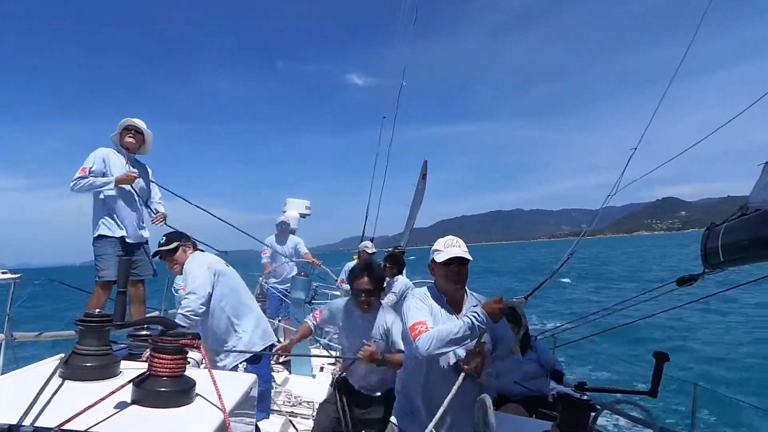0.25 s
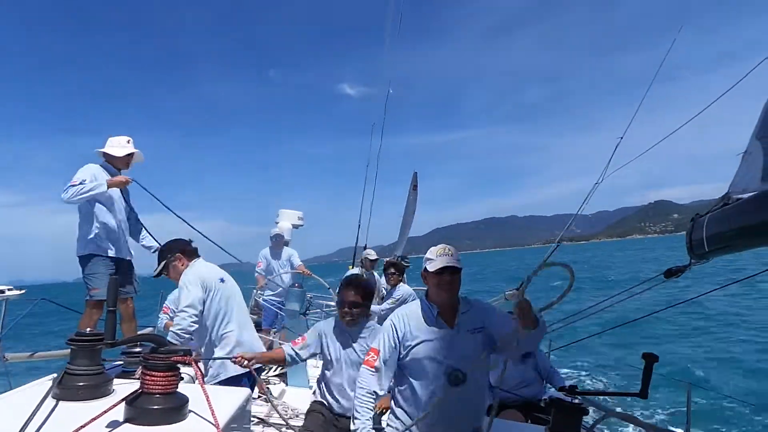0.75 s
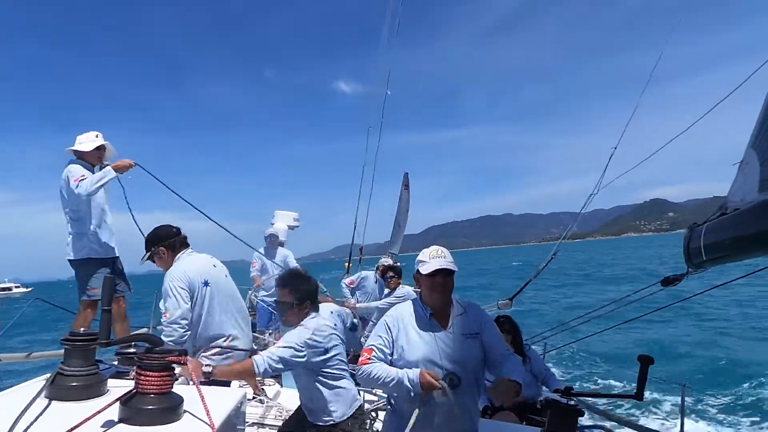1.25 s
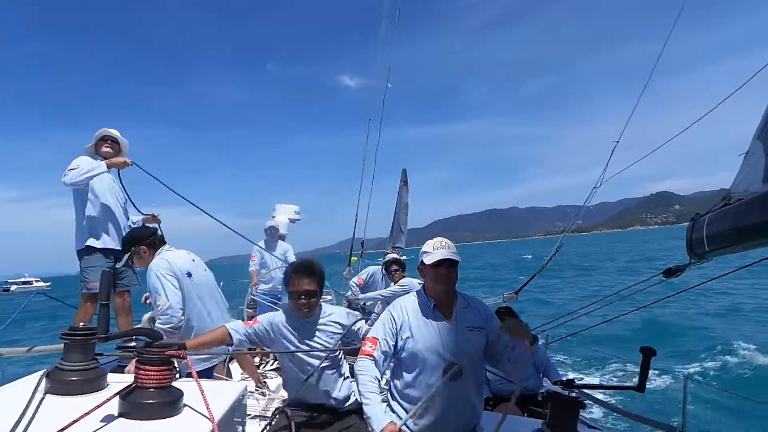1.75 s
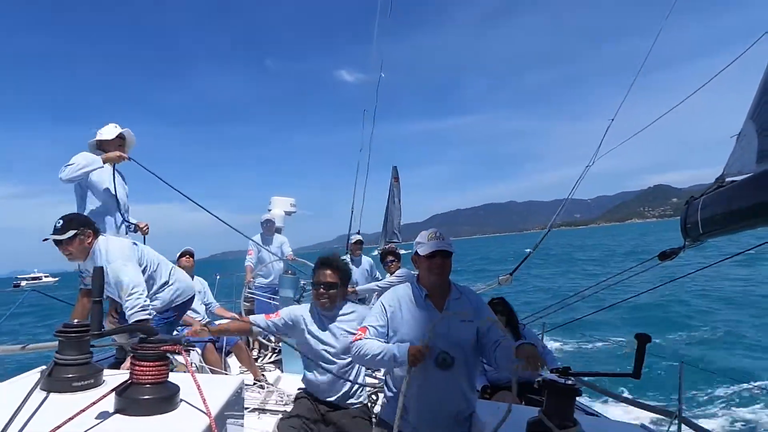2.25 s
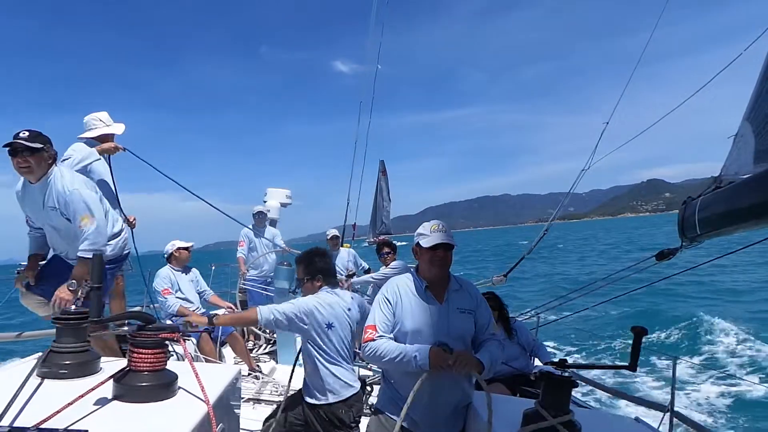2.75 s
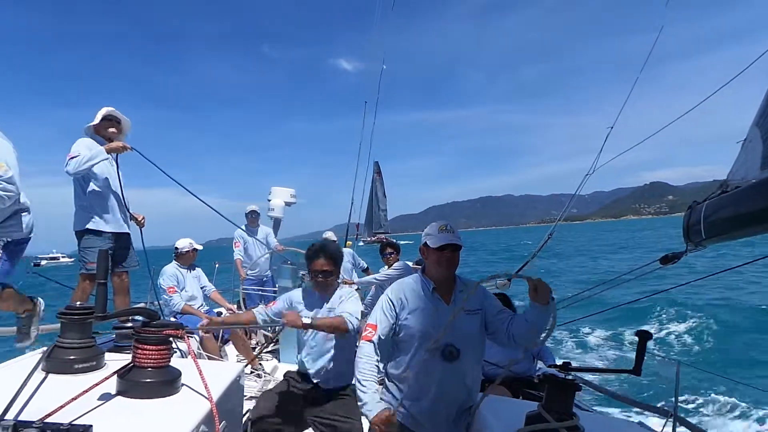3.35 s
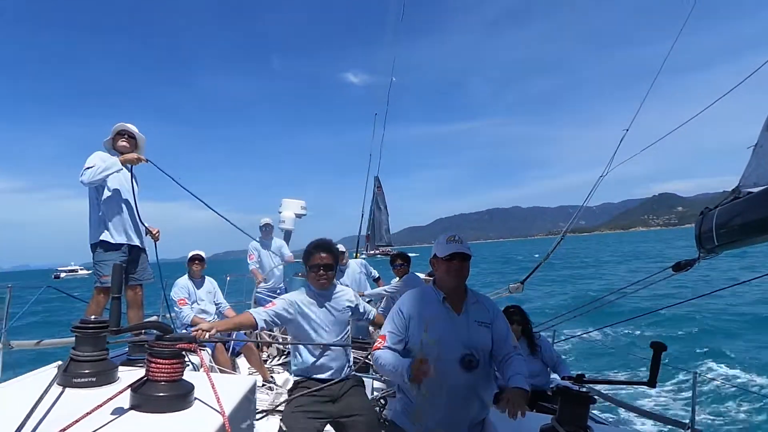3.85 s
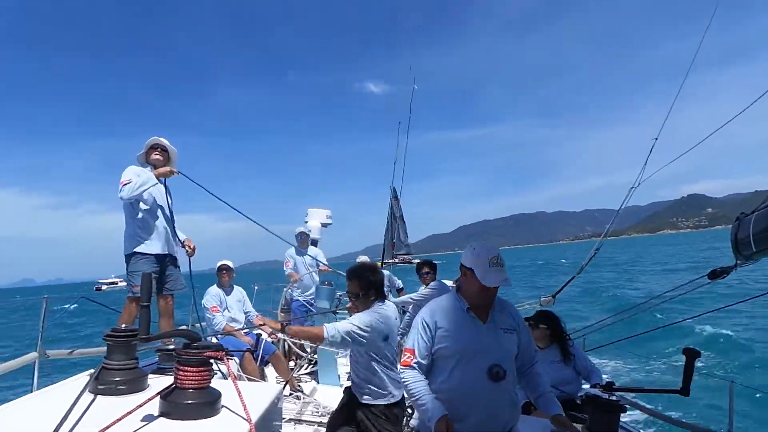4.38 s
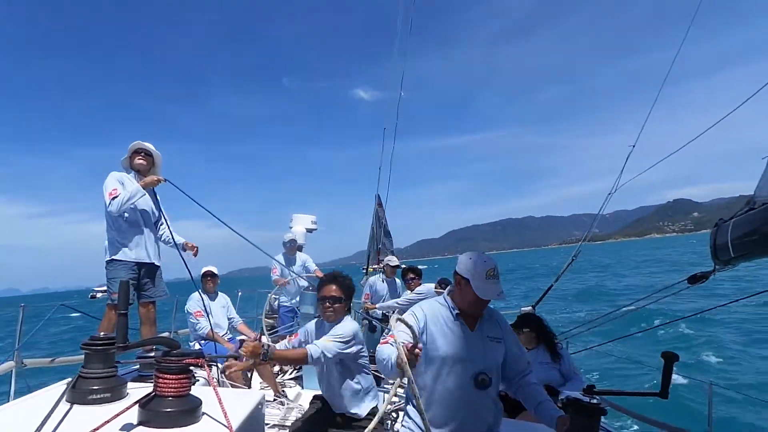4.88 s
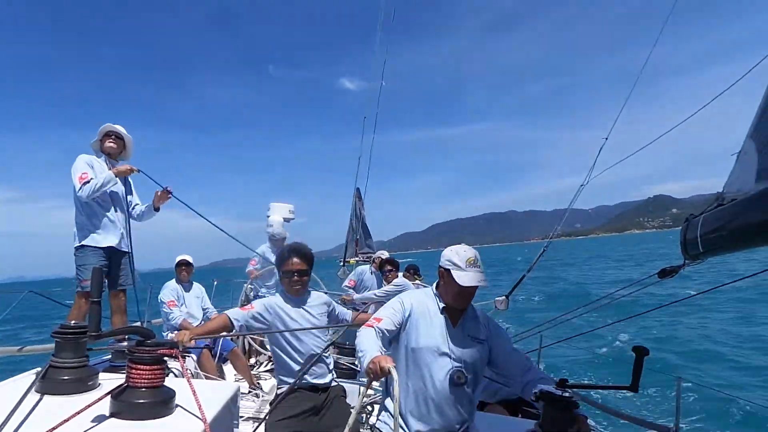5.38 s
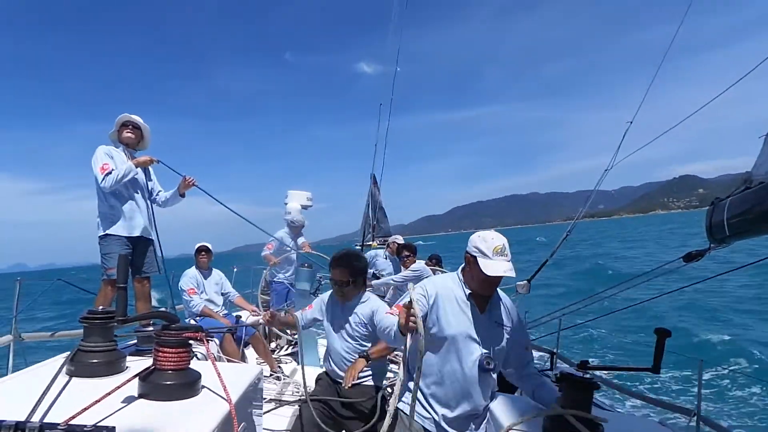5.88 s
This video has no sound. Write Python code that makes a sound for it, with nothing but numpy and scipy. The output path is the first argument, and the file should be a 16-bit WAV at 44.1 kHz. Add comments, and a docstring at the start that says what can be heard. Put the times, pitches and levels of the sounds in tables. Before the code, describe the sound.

Bright, ringing ratchet bursts from a deck winch come about once a second, with clicks between, as wind rumble and dull knocks thicken after four seconds.

```python
"""A deck winch on a sailboat spins in bursts, close to the microphone, as a sheet is hauled in arm over arm.
Pawl impulses excite the resonant modes of the metal drum, shaped noise makes the rush of the bearings, and
dense low grains make the drone of the deck; lone pawls click as short noise over ringing modes.
Gear knocks and wind pops are damped swings that sag in pitch; wind buffeting is clustered low grains,
and behind it the wake hisses as dense shaped grains."""
import sys
import numpy as np
from scipy import signal
from scipy.fft import rfft, irfft, next_fast_len
from scipy.io import wavfile
from scipy.ndimage import uniform_filter1d

SR = 44100
rng = np.random.default_rng(int(sys.argv[2]) if len(sys.argv) > 2 else 0)


def to_wav(s):
    """Save 16-bit WAV."""
    ch = np.atleast_2d(s).T  # columns
    pcm = np.round(np.clip(ch, -1, 1) * 32767)  # PCM
    wavfile.write(sys.argv[1], SR, pcm.astype(np.int16))


N = 269884
TIME = np.arange(N) / SR

# resonant modes of the metal drum: f/Hz, bandwidth/Hz, relative level/dB
DRUM_MODES = [(1170, 40, -5), (1395, 55, -5), (1690, 60, -7), (2050, 40, -10), (2528, 40, 2),
              (2920, 110, -10), (3500, 110, -2), (3560, 60, -3), (3690, 90, -3), (4150, 60, -3),
              (4205, 32, 0), (4985, 26, -1), (5170, 75, -2), (5880, 28, -8), (6595, 80, -2),
              (7240, 140, -11), (7830, 120, -10), (8360, 80, -3), (9300, 200, -4), (9560, 130, 0),
              (9750, 200, -4), (10700, 100, -17), (12900, 200, -20), (14300, 200, -20)]


def undb(db):
    """Level to amplitude: 20 dB is a factor of ten."""
    return 10 ** (np.asarray(db) / 20)


def level(x, db):
    """Scale to an rms level, the root of the mean power."""
    return x * undb(db) / np.sqrt(np.mean(x ** 2))


def colour(x, table):
    """Linear filtering: multiply the spectrum by a gain through points of f/Hz, gain/dB."""
    size = next_fast_len(N)
    hz, db = np.transpose(table)
    bins_hz = np.arange(size // 2 + 1) * SR / size
    gain = undb(np.interp(np.log(bins_hz + 1), np.log(hz), db))
    return irfft(rfft(x, size) * gain, size)[:N]


def ring(x, hz, width_hz):
    """Damped resonance: one complex pole, whose bandwidth sets the exponential decay."""
    pole = np.exp((2j * np.pi * hz - np.pi * width_hz) / SR)
    return signal.lfilter([1], [1, -pole], x).imag


def no_bass(x):
    """High-pass filter: the drum's ringing carries little below about 700 Hz."""
    return signal.sosfilt(signal.butter(3, 700, "high", fs=SR, output="sos"), x)


def walk(rate):
    """Slow random modulation: values held 1 / rate s, smoothed twice; standard deviation about 0.4."""
    k = int(SR / rate)
    steps = np.repeat(rng.standard_normal(N // k + 1), k)
    return 0.5 * uniform_filter1d(uniform_filter1d(steps, k), k)[:N]


def grains(rate, scatter_db):
    """Shot noise: random impulses of either sign, rate per second, a few much bigger than the rest."""
    hit = rng.random(N) < rate / SR
    return hit * rng.standard_normal(N) * undb(scatter_db * rng.exponential(size=N))


def curves(table):
    """Piecewise linear envelopes: interpolate each column over the times in the first."""
    s, *columns = np.transpose(table)
    return [np.interp(TIME, s, c) for c in columns]


def winch():
    """Modal excitation: faster spin gives more and harder pawl hits, each exciting the modes in its own mix."""
    # bearing and rope rush between the modes: f/Hz, relative spectral level/dB per Hz
    rush_spectrum = [(800, -27), (1500, 6), (2000, 3), (3000, -1), (5000, 1.5), (8000, -4.5), (10000, 7),
                     (10800, -13), (11700, -70), (13000, -0.5), (15000, -10)]
    # deck under the winch: f/Hz, relative spectral level/dB per Hz
    deck_spectrum = [(60, -42), (130, -11.5), (210, -9), (260, 2), (600, 0), (780, 1.5), (1050, 0.5),
                     (1500, -9), (2000, -27.5), (2800, -35.5)]
    hiss_db, ring_db, deck_db = spin()

    speed = undb(0.5 * (hiss_db + 23.5))
    teeth = grains(1200 + 1500 * speed, 0.21)
    teeth /= np.sqrt(uniform_filter1d(teeth ** 2, size=SR // 20) + 1e-9)  # even out the local power
    drive = teeth * undb(hiss_db)

    mode_waver_db = 4.5  # per unit of walk: each mode swells and fades alone
    drum = np.zeros(N)
    for hz, width_hz, db in DRUM_MODES:
        waver = undb(db + mode_waver_db * walk(10))
        drum += waver * width_hz * ring(drive * rng.standard_normal(N), hz, width_hz)
    drum = no_bass(drum * drive.std() / drum.std())

    rush = colour(rng.standard_normal(N) + 0.31 * teeth, rush_spectrum)
    rush = level(rush, -1.97) * undb(hiss_db + 0.47 * walk(24.28))
    metal = undb(-0.42) * drum + rush
    body = colour(metal, [(8500, 0), (8900, -60)])
    treble = metal - body
    deck = level(colour(grains(2500, 1.0), deck_spectrum), 3.5) * undb(deck_db + 4.3 * walk(40))
    return undb(ring_db) * body + undb(3.5) * treble + deck


def spin():
    """Incoherent addition: overlapping pulls add their energy, so the loudest weighs most in the ring."""
    # pulls and small after-tugs on the sheet; levels precede the gains in winch():
    # start t/s, spin-up t/s, hold t/s, run-down t/s, top hiss level/dB, drum ring over hiss/dB,
    # deck drone level at full spin/dB
    pull_table = [(-0.3, 0.17, 0.05, 0.39, -24, 6, -27), (0.121, 0.32, 0.057, 0.047, -22, 5.5, -25.5),
                  (0.396, 0.1, 0.13, 0.26, -35.5, 4.5, -34.5), (0.774, 0.19, 0.16, 0.52, -23, 7.5, -22.5),
                  (1.364, 0.053, 0.024, 0.3, -34.5, 5, -30.5), (1.367, 0.44, 0.28, 0.12, -24, 6, -24),
                  (2.34, 0.25, 0.09, 0.34, -20.5, 7, -20), (3.191, 0.21, 0.19, 0.28, -23, 8, -21),
                  (3.598, 0.094, 0.11, 0.14, -34.5, 8.5, -26.5),
                  (3.972, 0.31, 0.072, 0.22, -21.5, 7, -21.5), (4.396, 0.092, 0.13, 0.2, -42.5, 4, -36),
                  (4.854, 0.25, 0.16, 0.1, -23, 7.5, -21.5), (5.2, 0.093, 0.044, 0.26, -32.5, 5, -34.5),
                  (5.751, 0.26, 0.043, 0.13, -20, 7.5, -21)]
    rest_db, rest_ring_db, deck_rest_db = -63.5, 10, -47.5  # hiss, ring over hiss and drone at rest
    deck_slope, ring_slope = 0.77, -0.11  # dB of drone, and of ring gained, per dB of hiss
    deck_lead_s = 0.02  # the deck feels the load before the drum gathers speed
    uneven_db, ring_wander_db = 2, 1.5  # per unit of walk: uneven spin, drift of the ring

    hiss = undb(rest_db) ** 2
    ringing = undb(rest_db + rest_ring_db) ** 2
    deck = undb(deck_rest_db) ** 2
    unevenness = uneven_db * walk(14)
    for s, up, hold, down, top_db, ring_db, drone_db in pull_table:
        db = pull(TIME - s, up, hold, down) + unevenness
        early_db = pull(TIME - s + deck_lead_s, up, hold, down)
        hiss = hiss + undb(top_db + db) ** 2
        ringing = ringing + undb(top_db + ring_db + (1 + ring_slope) * db) ** 2
        deck = deck + undb(drone_db + deck_slope * early_db) ** 2
    ring_over_hiss_db = 10 * np.log10(ringing / hiss) + ring_wander_db * walk(10)
    return 10 * np.log10(hiss), ring_over_hiss_db, 10 * np.log10(deck)


def pull(t, up, hold, down):
    """Dry friction: level/dB re full spin climbs along an S, holds, then falls as the speed drops linearly."""
    spin_up_db, run_down_power = 29, 1.75  # climb from the first creep; hiss ~ speed ** power
    climb = np.clip(t / up, 0, 1)
    speed = np.clip(1 - (t - up - hold) / down, 1e-3, 1)
    db = -spin_up_db * np.cos(np.pi / 2 * climb) ** 2 + 20 * run_down_power * np.log10(speed)
    return np.where(t < 0, -100, db)


def clicks():
    """Impulse response: a dropped pawl gives a short noise crack and sets the drum modes ringing freely."""
    # lone pawl clicks: t/s, peak level of the ring before the final filter/dB, favoured mode f/Hz
    click_table = [(0.1637, -8.5, 2510), (0.5884, -22, 2500), (0.7547, -20, 2500), (1.5152, -0.5, 2530),
                   (2.212, -19, 2520), (3.0571, -8.5, 4985), (3.1562, -19, 3470), (3.1732, -19.5, 3470),
                   (3.8993, -17, 2520), (4.5304, -31, 3500), (4.7318, -14.5, 2500), (4.7443, -11, 4960),
                   (4.856, -16.5, 4200), (4.8794, -18, 2500), (5.5795, -17.5, 4300), (5.7022, -16, 2510),
                   (5.7214, -25, 3500)]
    tick_count, tick_db, tick_scatter_db = 20, -31, 3  # faint ticks at random times
    out, t = np.zeros(N), TIME[:SR // 4]
    hz, width_hz, mode_db = np.transpose(DRUM_MODES)
    rings = np.sin(2 * np.pi * np.outer(hz, t)) * np.exp(-np.pi * np.outer(width_hz, t))

    ticks = []
    for a, b, c in rng.random((tick_count, 3)):
        ticks.append((a * TIME[-1], tick_db + tick_scatter_db * (2 * b - 1), 2400 + 2600 * c))
    for s, db, lead_hz in list(click_table) + ticks:
        gain = undb(1.6 * mode_db + 2 * rng.standard_normal(len(hz)) - 3)
        gain[np.abs(hz - lead_hz).argmin()] = 1  # the favoured mode
        sound = gain @ rings
        crack = 0.4 * rng.standard_normal(len(t)) * np.exp(-t / 0.005)
        sound = sound / np.abs(sound).max() + crack
        i = int(s * SR)
        out[i:i + len(t)] += undb(db) * sound[:N - i]
    return colour(out, [(1200, -40), (2200, 0), (8500, -3), (9200, -30)])


def knocks():
    """Damped oscillation: a swing sagging in pitch, a faster-decaying overtone and a rough edge of noise."""
    # knocks and wind pops: t/s, swing level before its decay/dB, initial f/Hz,
    # decay by 60 dB t/s (at least 0.005), noise edge rms level before its decay/dB
    knock_table = [(0.164, -7, 322, 0.023, -13), (0.298, -16, 796, 0.061, -18),
                   (0.336, -0.5, 1044, 0.028, -3), (0.374, -18, 422, 0.087, -17),
                   (0.587, -34, 820, 0.021, -7), (2.124, -7, 466, 0.048, -20),
                   (2.19, -7.5, 132, 0.035, -26), (2.271, -11.5, 146, 0.065, -35),
                   (2.408, -26, 164, 0.13, -17.5), (2.932, -19, 760, 0.05, -21),
                   (3.042, 1, 252, 0.032, -10), (3.052, -9, 270, 0.076, -16.5),
                   (3.83, -1.5, 293, 0.078, -8.5), (3.961, -1, 117, 0.055, -37), (3.99, 0, 133, 0.043, -24),
                   (4.067, -0.5, 121, 0.07, -29), (4.113, 4, 150, 0.073, -20),
                   (4.447, -14, 142, 0.074, -22), (4.484, -7, 222, 0.046, -19),
                   (4.53, -16, 314, 0.014, -20), (4.553, 3.5, 219, 0.036, -20),
                   (4.588, 7.5, 288, 0.022, -18), (4.598, 11, 210, 0.015, -14),
                   (4.629, 1.5, 373, 0.025, -8), (4.659, 6, 183, 0.03, -17), (4.676, 2, 470, 0.013, -29),
                   (4.702, -14, 199, 0.017, -29), (4.729, 0.5, 293, 0.057, -8.5),
                   (4.79, 3.5, 158, 0.024, -18), (4.811, 6, 358, 0.018, -26), (4.829, 7, 305, 0.036, -27),
                   (4.844, 2, 520, 0.024, -20), (4.87, 2.5, 242, 0.034, -21), (5.074, 1.5, 215, 0.051, -12),
                   (5.145, -5, 266, 0.071, -25), (5.199, -14, 310, 0.036, -14),
                   (5.433, -6.5, 300, 0.035, -22), (5.453, -15, 400, 0.024, -27),
                   (5.498, -9, 350, 0.044, -25), (5.511, -3.5, 480, 0.029, -25),
                   (5.536, -8.5, 197, 0.042, -41), (5.58, -13, 300, 0.05, -15),
                   (5.664, -9.5, 294, 0.027, -34), (5.713, -10.5, 258, 0.027, -28),
                   (5.758, -10, 310, 0.031, -20), (5.766, -3, 393, 0.013, -25),
                   (5.79, -2.5, 366, 0.021, -12.5), (5.811, -12, 320, 0.037, -25),
                   (5.878, -10.5, 327, 0.05, -26)]
    overtone, overtone_db = 2.32, -7  # multiple of the pitch; initial level under the swing
    out, t = np.zeros(N), TIME[:SR // 8]
    band = signal.butter(3, [400, 1300], "band", fs=SR)
    edges = signal.lfilter(*band, rng.standard_normal((len(knock_table), len(t))))
    for (s, db, hz, t60, edge_db), noise in zip(knock_table, edges / edges.std()):
        fade = np.exp(-np.log(1000) * t / max(t60, 0.005))
        turn = 2 * np.pi * hz * t * (1 - 3 * t)  # phase/rad
        tones = np.sin(turn) + undb(overtone_db) * fade * np.sin(overtone * turn)
        swing = undb(db) * tones * (1 - np.exp(-t / 0.0012))
        lag = np.maximum(t - 0.0015, 0)  # the edge starts 1.5 ms after the swing
        edge = undb(edge_db) * noise * (1 - np.exp(-lag / 0.0003))
        i = int(s * SR)
        out[i:i + len(t)] += (fade * (swing + edge))[:N - i]
    return out


def wind():
    """Turbulent pressure: eddies bursting on the microphone give a lumpy rumble with sharper pops above it."""
    # wind envelopes before fixed trims: t/s, rumble level/dB, pops re rumble level/dB
    wind_table = [(0.0, -38.5, 0), (0.1, -46, 11), (0.18, -25.5, 0), (0.3, -49, 12), (0.62, -36, 3.5),
                  (0.75, -46.5, 5), (0.95, -31.5, 6.5), (1.18, -31, 6.5), (1.26, -46, 2), (2.06, -33, 8),
                  (2.12, -19, 2), (2.2, -24.5, -9.5), (2.25, -30.5, -5), (2.33, -23, -13), (2.5, -28.5, 8),
                  (2.98, -39.5, 7.5), (3.26, -35.5, 0.5), (3.33, -29, 3.5), (3.58, -28.5, 10.5),
                  (3.75, -21.5, -5), (3.82, -25, 3), (4.0, -20.5, -10), (4.2, -14.5, -6), (4.5, -12, -3),
                  (4.56, -15, 0.5), (4.64, -20, 3), (4.7, -30, 2), (4.83, -15, 4.5), (4.92, -25.5, -0.5),
                  (5.2, -19, 9.5), (5.34, -36.5, -2), (5.45, -23.5, 7.5), (5.63, -34, 2.5),
                  (5.88, -28, 2.5), (6.12, -35, 0)]
    level_db, bright_db = curves(wind_table)
    rumble = colour(grains(900, 1.55), [(25, -49), (50, -19.5), (90, -7.0), (160, -2.5), (230, -7.0),
                                        (450, -32), (2000, -72)])
    pops = colour(grains(500, 1.6), [(120, -53), (240, -0.5), (420, 0.0), (800, -14), (1800, -44),
                                     (6000, -51.0)])
    rumble = level(rumble, 0.76) * undb(level_db + 1.6 * walk(22.34))
    pops = level(pops, -1.5) * undb(level_db + bright_db + 0.81 * walk(30))
    return rumble + pops


def wake():
    """Broadband flow noise: water hisses past the hull as dense shaped grains, swelling a little."""
    # wake: f/Hz, relative spectral level/dB per Hz
    wake_spectrum = [(90, -39), (150, -51), (450, -13.5), (750, -5.5), (1500, -14), (2500, -17.5),
                     (5000, -26), (8000, -26.5), (14500, -38)]
    hiss = level(colour(grains(4000, 0.97), wake_spectrum), -38)
    return hiss * undb(1.8 * walk(1.45))


def scene():
    """Superposition: the pressures of all sources add, the same in both channels."""
    mono = winch() + clicks() + knocks() + wind() + wake()
    return np.array([mono, mono])


def record(dry):
    """Saturation and band limiting: the microphone rounds the loudest peaks and cuts above 14550 Hz."""
    rounded = np.tanh(1.058 * dry) / 1.152
    return signal.sosfilt(signal.ellip(10, 0.2, 70, 14550, fs=SR, output="sos"), rounded)


dry = scene()
out = record(dry)
to_wav(out)
```